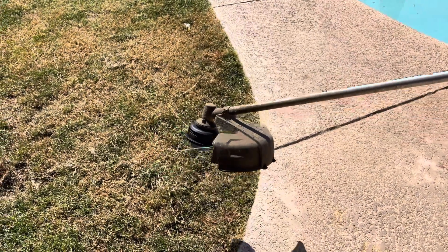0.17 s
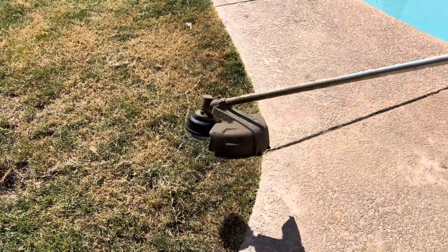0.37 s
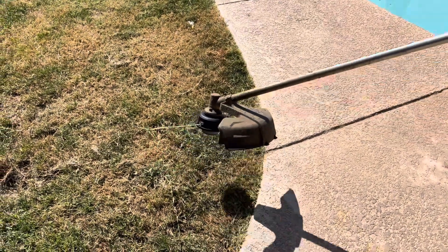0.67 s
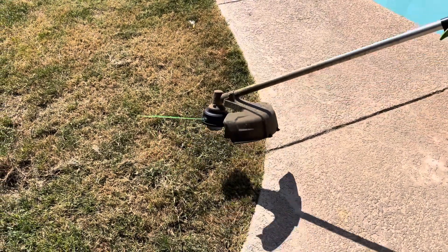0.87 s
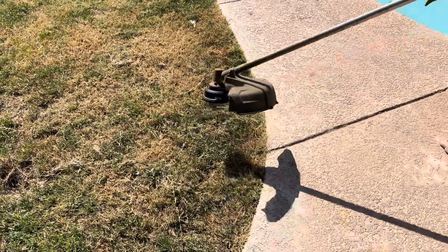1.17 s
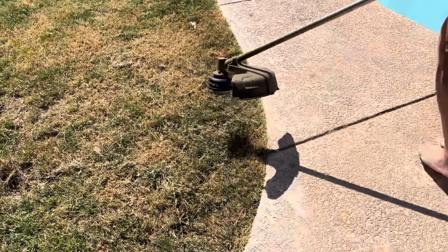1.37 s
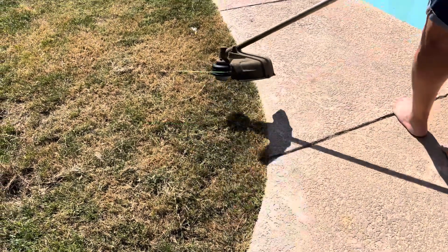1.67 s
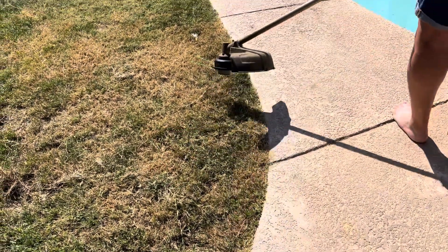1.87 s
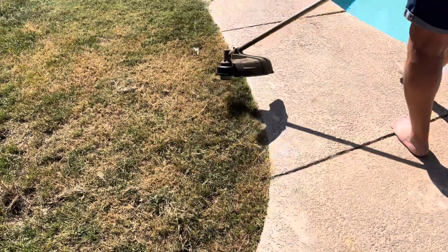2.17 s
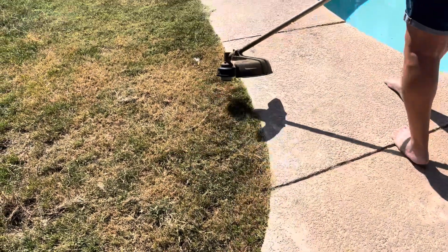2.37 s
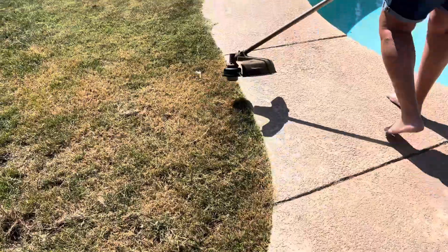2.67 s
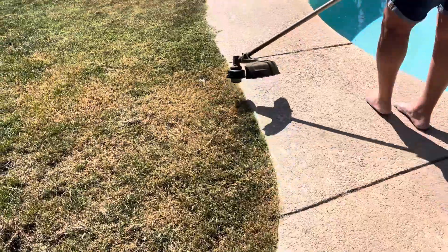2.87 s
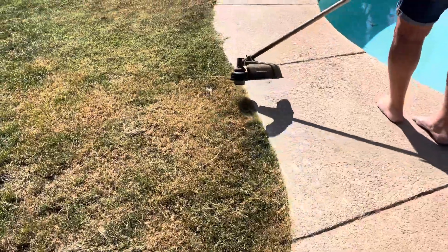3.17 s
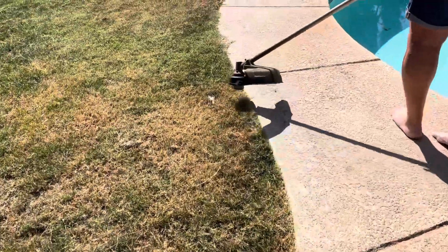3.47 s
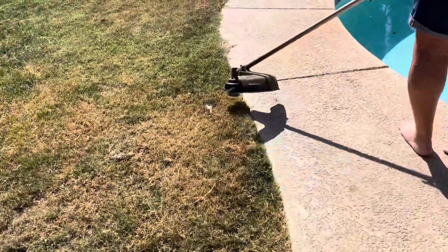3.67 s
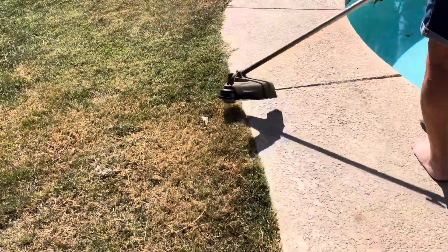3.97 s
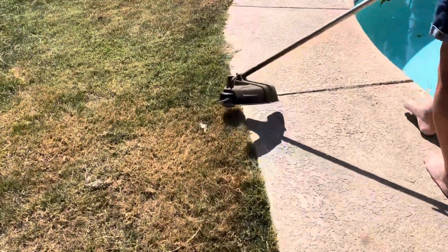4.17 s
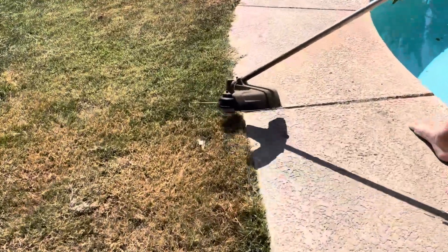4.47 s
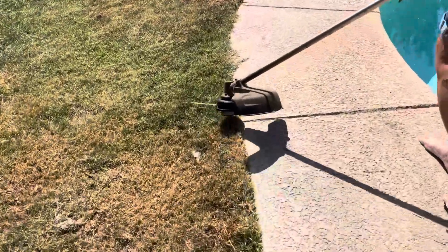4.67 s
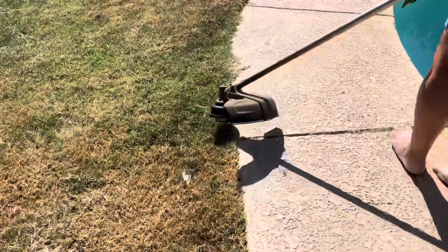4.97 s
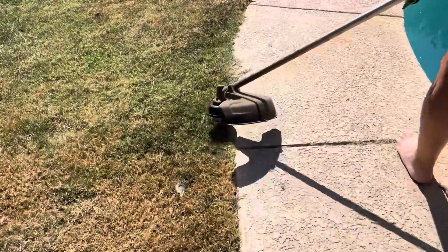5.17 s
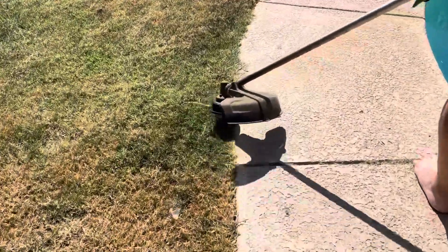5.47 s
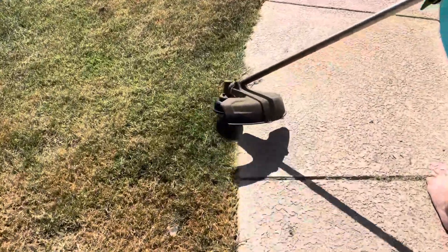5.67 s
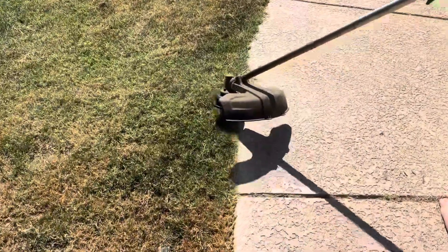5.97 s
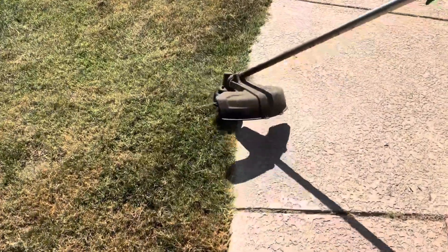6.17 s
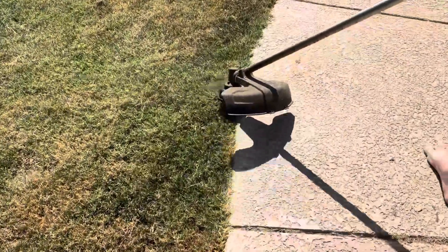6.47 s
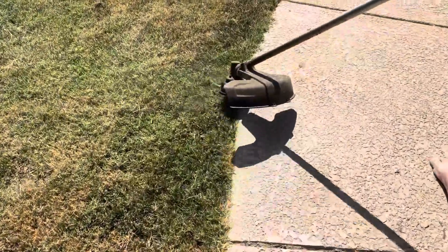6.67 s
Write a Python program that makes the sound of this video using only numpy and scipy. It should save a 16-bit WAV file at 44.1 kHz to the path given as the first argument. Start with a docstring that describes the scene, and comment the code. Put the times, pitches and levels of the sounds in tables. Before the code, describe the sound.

A string trimmer edges a dry lawn by a concrete path, heard close in stereo outdoors. From 0 to 1 second, separate hard slaps of line on concrete spray sharp grit and ring the plastic guard and shaft; a pebble tocks at 0.3, and a wavering swish climbs quickly around 0.9. From 1.0 to 1.3 the blows crowd together with snapping, falling thumps; another strong thump lands at 1.8, weaker ones until 2.8. Between 1.5 and 3.4, shorter scuffs, chattering drags and pattering grit continue, with soft air buffeting strongest near 1.4. The drive speeds up from 3.1 to 3.4. By 4 seconds the clatter is gone, leaving bright shredding hiss, dry crackle and a thin steady whine near 1.9 kHz. A low fluttering hum around 200 Hz swells in after 5.3, and a pulsing rasp thickens from 6 to the end at 6.8.

```python
"""Dry lawn along a concrete path: a cordless string trimmer edges it, close by.
At first the nylon line slaps the concrete and flings grit against the plastic guard; some blows end in a
falling thump. Then it runs in the grass: the line hums and hisses, blades crackle, the drive whines.
Sines on multiples of the turning rate make hum and whine; shaped noise and rung resonances make the rest.
Table levels are relative, before the trims in the functions."""
import sys
import numpy as np
from scipy import signal
from scipy.fft import rfft, irfft, next_fast_len
from scipy.io import wavfile
from scipy.ndimage import uniform_filter1d, map_coordinates

SR = 44100
rng = np.random.default_rng(int(sys.argv[2]) if len(sys.argv) > 2 else 0)


def master_out(mix):
    """Clip the mix to full scale and print it as 16-bit PCM to the path in sys.argv[1]."""
    frames = np.transpose(np.atleast_2d(mix))
    ceiling = np.clip(frames, -1, 1)
    pcm = np.round(ceiling * 32767).astype(np.int16)
    wavfile.write(sys.argv[1], SR, pcm)


N = 301203

WHINES_PER_TURN = 19
SIDES = np.array([[1], [-1]])  # left, right

# drag of the grass on the line: time_s, share (0-1)
LOAD_ROWS = [(3.6, 0.35), (4, 0.57), (6.83, 0.85)]
# hum of the line: time_s, level_db
HUM_ROWS = [(2.95, -85), (3.14, -52), (3.36, -51), (3.6, -52), (3.77, -63), (3.9, -55), (4.1, -55.5),
            (4.3, -66), (4.46, -51), (4.6, -55.5), (5.27, -51), (5.35, -37), (5.41, -54), (5.48, -42),
            (5.7, -44.5), (5.8, -54), (6.0, -48), (6.05, -40), (6.28, -37), (6.35, -46), (6.43, -35),
            (6.56, -36), (6.7, -45), (6.8, -37.5)]
# blows that end in a falling thump and a lull in the hiss: start_s, level_db, swell_s
THUMP_ROWS = [(1.014, -15, 0.0079), (1.062, -14, 0.0067), (1.153, -14, 0.011), (1.207, -9, 0.0079),
              (1.288, -12, 0.01), (1.803, -9.5, 0.0024), (2.303, -23, 0.003), (2.509, -20, 0.0026),
              (2.848, -19, 0.0018)]
# swish spectrum: freq_hz, density_db (per Hz)
SWISH_SPECTRUM = [(1800, -22.5), (2900, -1), (3700, 0.5), (4500, 4), (5300, 2.5), (6400, 0), (7500, -13),
                  (10000, -60)]
# phase by which the left microphone port leads: freq_hz, lead_rad
PORT_LEAD = [(100, 0.5), (1300, 0.96), (2000, -0.9), (3100, 1.5), (3900, 0), (4600, 1.5), (5350, 4),
             (6000, 6), (7200, 7.5), (8700, 6.5), (9500, 4), (10250, 3), (10900, 2.4), (11400, 0.5),
             (12700, -0.5), (13700, -3.5), (15000, -6)]


def amp(db):
    """Decibels to gain."""
    return np.exp(np.asarray(db) * (np.log(10) / 20))


def unit(x):
    """Scale to rms 1."""
    return x / np.sqrt(np.mean(x ** 2) + 1e-20)


def along(points, hz):
    """Read (Hz, value) points on a log axis."""
    f, v = np.transpose(points)
    return np.interp(np.log(hz + 1), np.log(f + 1), v)


def curves(rows):
    """One value per sample for each column after the time."""
    s, *cols = np.transpose(rows)
    return [np.interp(np.arange(N) / SR, s, c) for c in cols]


def wobble(rate_hz):
    """Smooth random curve with rate_hz knots a second."""
    coarse = np.arange(N + 32)[::32]
    knots = rng.standard_normal(int(N * rate_hz / SR) + 4)
    smooth = map_coordinates(knots, [coarse * rate_hz / SR])
    return np.float32(np.interp(np.arange(N), coarse, smooth))


def filtered(x, response):
    """Apply a complex response of frequency."""
    m = next_fast_len(N + 8192, real=True)
    return irfft(rfft(x, m) * response(np.fft.rfftfreq(m, 1 / SR)), m)[..., :N]


def shape(points):
    """Response of a smooth spectrum."""
    return lambda hz: amp(along(points, hz))


def body(modes):
    """Sum of band-pass resonances (Hz, width Hz, dB) with alternating signs."""
    def response(f):
        total = 0
        for k, (centre, width, db) in enumerate(modes):
            damping = 1j * f * width
            total = total + (-1) ** k * amp(db) * damping / (centre * centre - f * f + damping)
        return total
    return response


def noise(response, envelope):
    """Enveloped, filtered noise at two ports, partly alike and phase-shifted; mid level follows the envelope."""
    # likeness of the two ports: freq_hz, likeness (0-1)
    port_likeness = [(100, 1), (350, 0.99), (620, 0.69), (1000, 1), (2100, 0.61), (2800, 0.55),
                     (5200, 0.26), (7000, 0.35), (8000, 1), (10250, 1), (11100, 0.94), (12000, 0.73)]
    m = next_fast_len(N + 8192, real=True)
    hz = np.fft.rfftfreq(m, 1 / SR).astype(np.float32)
    alike, lead = np.float32([np.clip(along(port_likeness, hz), 0, 1), along(PORT_LEAD, hz)])
    gain = response(hz).astype(np.complex64)
    sources = rng.standard_normal((3, N), dtype=np.float32) * np.float32(envelope)
    common, left, right = rfft(sources, m)
    turn = np.cos(lead / 2) + 1j * np.sin(lead / 2)
    shared = np.sqrt(alike) * common * np.array([turn, turn.conj()])
    own = np.sqrt(1 - alike) * np.array([left, right])
    mid_power = np.mean(abs(gain) ** 2 * (1 + alike * np.cos(lead)) / 2)
    return irfft((shared + own) * gain, m)[:, :N] / np.sqrt(mid_power)


def grains(rate_hz, spread_db, life_s, share):
    """Envelope of brief random snaps holding a share of the power, on a steady bed."""
    chance, size = rng.random(N), rng.standard_exponential(N)
    snaps = (chance < rate_hz / SR) * amp(spread_db * np.minimum(size, 4))
    power = signal.lfilter([1], [1, -np.exp(-1 / (life_s * SR))], snaps ** 2)
    share = np.clip(share, 0, 1)
    return np.sqrt(1 - share + share * power / power.mean())


def lull(depth_db):
    """Gain that sinks briefly after each thump."""
    t = np.arange(N) / SR
    inside = sum((t > s + 0.008) & (t < s + 0.054) for s, _, _ in THUMP_ROWS)
    return amp(-depth_db * uniform_filter1d(inside.astype(float), size=300))


def patchy(x, depth_db):
    """Narrow bands swell and fade as the head moves over the ground."""
    z = signal.stft(x, nperseg=1024)[2]
    field = uniform_filter1d(rng.standard_normal(z.shape[1:]), size=3, axis=0)
    field = uniform_filter1d(field, size=36, axis=1)
    return signal.istft(z * unit(amp(depth_db * unit(field))), nperseg=1024)[1][:, :N]


def bass_ports(x):
    """Low sounds reach the left port earlier and louder."""
    lead_rad, balance_db = 0.85, 1.5  # balance is added left, taken off right
    ports = filtered(x, lambda hz: np.exp(0.5j * SIDES * lead_rad * hz / (hz + 10)))
    return ports * amp(SIDES * balance_db)


def contact_level(offset_db, slope):
    """Level in dB that follows contact strength, plus slope times its brightness."""
    # how hard the line works against the ground: time_s, level_db
    contact_rows = [(0, -45), (.25, -48), (.5, -41), (.75, -37), (.9, -40.5), (1.02, -32), (1.12, -42),
                    (1.42, -40.5), (1.65, -32), (1.83, -41), (2.05, -38.5), (2.16, -39.5), (2.45, -36),
                    (2.7, -34.5), (2.735, -39), (2.82, -33), (3.03, -33.5), (3.075, -36), (3.15, -37),
                    (3.85, -41.5), (4.4, -37), (4.7, -37), (5.5, -34), (6.5, -32.5), (6.83, -36)]
    # contact brightness, dull on concrete and bright in grass: time_s, brightness_db
    bright_rows = [(0, -9), (.2, -8), (.5, -16), (.95, -12), (1.14, 2), (1.38, -6.5), (1.5, -4.5),
                   (1.9, -1.5), (2.5, 0), (3.9, 5), (4.4, 2.5), (6.83, 1)]
    return curves(contact_rows)[0] + offset_db + slope * curves(bright_rows)[0]


def partial(turns, multiple, blur_rad):
    """Sine of rms 1 at a multiple of the turning rate, its phase blurred at random."""
    phase = 2 * np.pi * (multiple * turns % 1) + blur_rad * wobble(45)
    return np.sqrt(2) * np.sin(np.float32(phase))


def tones(turns):
    """Two line ends hum at twice the turning rate; the drive whines on a high multiple of it."""
    # overtones of the whirling line: time_s, fourth_db, sixth_db (at 4 and 6 times the turning rate)
    overtone_rows = [(3.7, -85, -75), (4.1, -74, -57), (4.3, -52, -52), (4.65, -51, -58), (5.15, -48, -49),
                     (5.7, -46.5, -53), (6.05, -47, -57), (6.4, -48, -59), (6.58, -61, -60),
                     (6.83, -46.5, -57)]
    # weaker line overtones: multiple (of the turning rate), level_db (over the fourth)
    faint_rows = [(3, -10.5), (5, -17), (8, -10), (10, -5)]
    # drive tones as it comes up to power: time_s, level_db
    drive_rows = [(3.4, -84), (3.85, -52), (4.25, -46), (4.9, -45), (5.1, -39), (5.7, -38), (6.5, -38.5),
                  (6.83, -41)]
    # thin, shrill partials of the drive: time_s, third_db, sixth_db (at 3 and 6 times the whine)
    shrill_rows = [(3.55, -80, -53), (3.82, -47, -44), (4.2, -55, -41), (4.72, -46, -49),
                   (4.85, -41.5, -44), (5.08, -40, -45), (5.18, -51, -54), (5.58, -46, -58),
                   (5.73, -35, -60), (5.88, -45, -60), (6.1, -62, -55), (6.72, -62, -60), (6.78, -39, -50),
                   (6.83, -54, -45)]
    hum_db, = curves(HUM_ROWS)
    drive_db, = curves(drive_rows)
    load, = curves(LOAD_ROWS)

    # reaching the grass makes the hum flutter
    in_grass = np.clip((np.arange(N) / SR - 3.62) / 0.28, 0, 1)
    flutter_db = 4.5 * np.clip(wobble(24), -2.5, 1.3) * in_grass
    hum = amp(hum_db - 4.5 + flutter_db) * partial(turns, 2, 0.65 * load)

    fourth_db, sixth_db = curves(overtone_rows)
    stack = [(4, fourth_db), (6, sixth_db)]
    stack += [(k, fourth_db + db) for k, db in faint_rows]
    overtones = sum(amp(db - 2.5 + 1.3 * wobble(9)) * partial(turns, k, 0.25) for k, db in stack)

    whine = amp(drive_db - 5.5 + 1.7 * wobble(24)) * partial(turns, WHINES_PER_TURN, 0.35)
    octave_db = drive_db - 9.5
    shrill = 0
    for k, db in zip((2, 3, 6), [octave_db, *curves(shrill_rows)]):
        level = amp(db + 2 * wobble(15))
        shrill = shrill + level * partial(turns, k * WHINES_PER_TURN, 0.25 * k)
    return (hum + overtones) * amp(SIDES) + whine + shrill


def flap():
    """The line flaps unevenly in the grass: a rough narrow-band drone just under its hum."""
    hum_db, = curves(HUM_ROWS)
    level = amp(hum_db - 12 + 4.5 * wobble(14)) * curves(LOAD_ROWS)[0]
    return noise(lambda f: 1 / (1 + ((f - 176) / 26) ** 4), level)


def rush(turns):
    """The line tears through air and grass; scrape and hiss strengthen as each end sweeps past."""
    # air rumbling round the head: time_s, level_db
    wash_rows = [(0, -43), (.25, -47), (.5, -41), (.8, -35.5), (1, -39.5), (1.15, -54), (1.45, -44.5),
                 (1.68, -42), (1.86, -56), (2.4, -53), (2.75, -50.5), (3.05, -45.5), (3.2, -50),
                 (3.4, -53.5), (3.85, -60.5), (4.4, -52), (4.7, -50), (5.5, -48), (6.5, -44.5), (6.83, -46)]
    # spectra: freq_hz, density_db (per Hz)
    rumble_spectrum = [(40, -24), (100, -3.5), (170, 1.5), (300, 1), (520, 0), (650, 1), (760, -6),
                       (880, 5.5), (1100, -5), (2000, -60)]
    scrape_spectrum = [(500, -51), (780, -5), (950, -0.5), (1300, 1.5), (1600, 3.5), (1850, 5), (2200, 6.5),
                       (2550, 0), (3050, 8), (4000, -53), (6000, -60)]
    hiss_spectrum = [(4500, -39), (6500, -5.5), (7900, 0.5), (8600, -0.5), (9300, 6), (9900, 7),
                     (10500, -3), (11300, -0.5), (11900, -14.5), (12800, -60), (16000, -65)]
    load, = curves(LOAD_ROWS)
    sweep = unit(1 + 0.22 * np.cos(4 * np.pi * turns))
    crackle = sweep * grains(rate_hz=400, spread_db=2, life_s=0.00041, share=0.32)
    rumble = noise(shape(rumble_spectrum), amp(curves(wash_rows)[0] + 1.2 * wobble(20)))

    # load terms: dB change at full drag
    scrape_db = contact_level(-2.83, -0.66) - 2 * load + 1.17 * wobble(40)
    scrape_grain = grains(rate_hz=370, spread_db=2.5, life_s=0.0007, share=0.66 * (1 - load))
    scrape = noise(shape(scrape_spectrum), amp(scrape_db) * sweep * scrape_grain)

    swish_db = contact_level(-0.32, 0) - 1.3 * load
    swish_grain = grains(rate_hz=450, spread_db=1.5, life_s=0.00058, share=0.65 * (1 - load))
    swish = noise(shape(SWISH_SPECTRUM), amp(swish_db) * swish_grain)

    hiss_db = contact_level(0.71, 0.85) + 6 * load
    hiss = noise(shape(hiss_spectrum), amp(hiss_db) * crackle)  # blades shred
    ground = scrape + swish * lull(depth_db=1) + hiss * lull(depth_db=11.5)
    return rumble + patchy(ground, depth_db=3)


def rasp(turns):
    """In thick grass each passing line end tears a resonant burst of its own strength."""
    # line ends rasping: time_s, level_db
    rasp_rows = [(5.75, -64), (6, -46), (6.15, -39), (6.3, -34.5), (6.41, -39.5), (6.55, -34),
                 (6.62, -35.5), (6.72, -37), (6.83, -36)]
    # rasp resonances: freq_hz, width_hz, level_db
    rasp_modes = [(2160, 100, -4.5), (3030, 198, -7.5), (3720, 370.7, -1.5), (4600, 310, 0)]
    db, = curves(rasp_rows)
    passes = unit(amp(5.87 * np.cos(4 * np.pi * turns) + 3.1 * wobble(70)))
    return noise(body(rasp_modes), amp(db) * passes)


def skim():
    """The line skims the ground: noise on a wavering carrier climbs and widens as the line gathers speed."""
    # swish band: time_s, centre_hz, level_db
    skim_rows = [(0, 2150, -40), (.3, 2300, -36), (.5, 2445, -29.5), (.58, 2700, -34), (.68, 3010, -30.5),
                 (.76, 3150, -25), (.83, 3900, -48), (.86, 4960, -38), (.875, 5510, -19), (.9, 4600, -19.5),
                 (.92, 4210, -30), (.945, 4810, -24), (.975, 3830, -28), (1.005, 4490, -24),
                 (1.03, 4450, -38), (1.08, 4400, -70)]
    hz, db = curves(skim_rows)
    breadth = np.clip((hz - 2800) / 1800, 0, 1)
    ragged = amp(db) * grains(rate_hz=200, spread_db=2, life_s=0.0015, share=0.78)
    narrow = noise(lambda f: 1 / (1 + (f / 380) ** 2), amp(-5) * ragged * np.sqrt(1 - breadth))
    wide = noise(lambda f: 1 / (1 + (f / 1900) ** 4), amp(-4.5) * ragged * np.sqrt(breadth))
    cycles = np.cumsum(hz * (1 + 0.077 * wobble(70))) / SR
    return (narrow + wide) * np.sqrt(2) * np.sin(2 * np.pi * cycles)


def blows():
    """Gritty scuffs spray dust and ring guard and shaft, plus a ping at a pitch set by the spot hit."""
    # hard blows of the line on concrete and guard: start_s, knock_db, spray_db, ring_hz
    blow_rows = [(0.0156, -30.5, -19.5, 2250), (0.071, -38, -26, 2200), (0.1194, -15.5, -10, 1990),
                 (.192, -15.5, -8, 1767), (0.271, -29.5, -26.5, 1770), (.31, -34, -24, 1410),
                 (0.3555, -24.5, -16.5, 2320), (.465, -35, -25, 2500), (.4792, -25, -26, 2200),
                 (.504, -29, -29, 2190), (0.528, -24, -21.5, 2040), (.572, -23, -27, 2055),
                 (.6755, -24.5, -25, 2260), (0.7016, -31, -18, 3000), (.7355, -16, -14.5, 2140),
                 (0.7918, -14.5, -14.5, 2344), (.836, -22, -13.5, 2270), (0.932, -23, -21, 1750),
                 (.964, -21, -34, 2306), (0.9805, -13, -18, 2110), (1.014, -15, -13, 1747),
                 (1.048, -20, -18, 1705), (1.06, -28.5, -13, 1690), (1.1208, -19.5, -13.5, 1894),
                 (1.152, -23, -18, 1530), (1.2057, -20.5, -12.5, 1804), (1.233, -26.5, -21, 2230),
                 (1.287, -17.5, -11, 1797), (1.2988, -25, -13, 1540), (1.3157, -26, -19.5, 1643),
                 (1.3667, -27.5, -24, 1860), (1.491, -28.5, -30, 2136), (1.572, -19, -15.5, 1293),
                 (1.5904, -21.5, -18, 1680), (1.6365, -25, -7.5, 1460), (1.666, -24, -16.5, 1040),
                 (1.699, -24, -19, 1970), (1.73, -23, -14.5, 1440), (1.7629, -25.5, -27, 1018),
                 (1.793, -24, -19, 1506), (1.843, -32.5, -46, 1510), (1.908, -25.5, -12, 1260),
                 (1.944, -29.5, -21, 2090), (2.0295, -26.5, -15.5, 1630), (2.045, -28, -19, 1633),
                 (2.072, -24, -14, 4120), (2.0923, -27.5, -20, 2100), (2.132, -25.5, -16, 3230),
                 (2.172, -30.5, -37, 1790), (2.217, -31.5, -20, 3030), (2.2993, -26, -31, 3240),
                 (2.351, -26, -17.5, 1935), (2.396, -44, -19, 2920), (2.42, -42, -17, 2000),
                 (2.44, -29, -25, 2950), (2.464, -26, -20, 3760), (2.5055, -24.5, -25, 1320),
                 (2.5546, -29.5, -23, 1670), (2.5947, -28, -23, 1240), (2.6305, -30, -19, 1150),
                 (2.643, -33, -13, 3600), (2.667, -38, -15, 1310), (2.699, -25, -9.5, 3660),
                 (2.776, -36, -18, 2530), (2.845, -23, -17, 1700), (2.9594, -25, -14, 2360),
                 (2.991, -25, -12, 2370), (3.024, -29, -14, 2510), (3.048, -34, -18, 3930),
                 (3.082, -27.5, -15, 2270), (3.107, -28, -14, 2280), (3.124, -31, -26, 1900),
                 (3.184, -47, -19, 3000), (3.266, -34, -18, 2850), (3.389, -32, -13, 2650),
                 (6.566, -48, -8, 4195), (6.616, -39, -7, 3920)]
    # shaft ring, damped once the head rests on the lawn: time_s, level_db (over the knock)
    shaft_ring_rows = [(0, -17.5), (.36, -3), (.55, -1.5), (.75, -0.5), (.95, -5), (1.15, -12), (1.55, -8),
                       (1.9, -12.5), (3.3, -16)]
    # resonances: freq_hz, width_hz, level_db
    guard_modes = [(990, 42, -0.5), (1268, 91, 0.5), (1443, 49, 6), (1710, 100, 5.5), (2000, 220, 3),
                   (2335, 170, 3.5), (2663, 67, -2.5), (3160, 110, 1)]
    shaft_modes = [(190, 50, -10), (294, 16, 5), (445, 36, 1), (500, 14, 3.5), (615, 26, 6), (917, 110, -5)]
    # spray spectrum: freq_hz, density_db (per Hz)
    spray_spectrum = [(4500, -60), (6300, -26), (7200, -1.5), (8700, 3.5), (9900, 15), (11200, 2),
                      (12500, -5), (13900, -28), (15600, -8.5), (16500, -42)]
    t = np.arange(SR // 5) / SR
    power, pings = np.zeros((4, N + SR)), np.zeros((2, N + SR))
    flutter = unit(filtered(rng.standard_normal((2, N)), lambda f: 1 / (1 + (f / 290) ** 2)))
    # base t60 in s: shaft, guard, crack, spray
    life_s = 0.06 * np.array([[1.1], [0.85], [0.8], [0.6]])
    attack = 1 - np.exp(-t / 0.0017)
    for s, knock_db, spray_db, ring_hz in blow_rows:
        start = max(round(s * SR), 0)
        # glancing blows are briefer: each 24 dB of spray over knock halves the length
        haste = 2 ** ((spray_db - knock_db) / 24)
        fall = amp(-60 * t / life_s * haste) * attack
        shaft_db = knock_db + np.interp(s, *np.transpose(shaft_ring_rows))
        crack_db = (knock_db + spray_db) / 2 - 0.84
        level = amp([[shaft_db], [knock_db + 3.5], [crack_db], [spray_db + 1]])
        power[:, start:][:, :len(t)] += (level * fall) ** 2
        quadrature = [1, 1j] @ flutter.take(start + np.arange(len(t)), axis=1, mode="wrap")
        phase = 2 * np.pi * ring_hz * t + along(PORT_LEAD, ring_hz) * SIDES / 2
        ping = np.real(quadrature * np.exp(1j * phase))
        pings[:, start:][:, :len(t)] += amp(knock_db + 3) * fall[1] * ping
    shaft, knock, crack, spray = np.sqrt(power[:, :N])
    scuff = grains(rate_hz=1400, spread_db=3, life_s=0.00011, share=0.43)
    ring = noise(body(shaft_modes), shaft) + noise(body(guard_modes), knock * scuff) + pings[:, :N]
    return ring + noise(shape(SWISH_SPECTRUM), crack * scuff) + noise(shape(spray_spectrum), spray * scuff)


def drags(edge_s=0.0024):
    """The line drags along the concrete edge and chatters: rough noise bursts round one pitch."""
    # drags: start_s, length_s, level_db, centre_hz, width_hz
    drag_rows = [(1.575, 0.038, -26.5, 1320, 380), (1.664, 0.054, -30, 2300, 1310),
                 (1.765, 0.027, -31.5, 1300, 450), (1.908, .05, -34, 1680, 600),
                 (2.033, .04, -33, 1700, 646), (2.441, 0.017, -30, 2920, 250),
                 (2.446, 0.046, -36, 1410, 380), (2.463, .015, -30, 3800, 350),
                 (2.558, 0.031, -35, 1590, 380), (2.593, 0.015, -26.5, 1220, 300),
                 (2.632, 0.0092, -28, 1170, 279), (2.634, .022, -31, 3300, 700),
                 (2.645, .045, -35, 1330, 220), (2.699, 0.017, -26, 3680, 550), (2.76, .05, -38, 2480, 200),
                 (2.882, 0.053, -30, 3070, 900), (2.922, 0.018, -28, 2500, 220),
                 (2.987, 0.064, -32, 2426, 230), (3.04, .012, -31, 3900, 200)]
    out = np.zeros((2, N + SR))
    chatter = grains(rate_hz=150, spread_db=1.5, life_s=0.0015, share=0.56)
    t = np.arange(SR // 8) / SR
    hz = np.fft.rfftfreq(len(t), 1 / SR)
    ports = np.exp(1j * along(PORT_LEAD, hz) * SIDES / 2)
    for s, length_s, db, centre_hz, width_hz in drag_rows:
        start = round(s * SR)
        scuff = rfft(rng.standard_normal(len(t)) + 0.5 * rng.standard_normal((2, len(t))))
        response = ports / (1 + ((hz - centre_hz) / width_hz) ** 4)
        band = unit(irfft(scuff * response, len(t)))
        gate = np.clip(np.minimum(t, length_s - t) / edge_s, 0, 1)
        out[:, start:][:, :len(t)] += amp(db) * gate * chatter[start:][:len(t)] * band
    return out[:, :N]


def thumps(start_hz=9000, glide_s=0.00014):
    """A sharp snap arrives first, then a swelling sine glides down as its bass trails behind."""
    # snap spectrum: freq_hz, density_db (per Hz)
    snap_spectrum = [(400, -14), (900, -9), (1700, 3), (3500, -4), (9000, -8), (14000, -35)]
    t = np.arange(SR // 6) / SR
    sweep = np.sin(2 * np.pi * start_hz * glide_s * np.log1p(t / glide_s))
    click = amp(-17.5) * np.exp(-t / 0.00049)  # the sharp front
    out, snaps = np.zeros((2, N + SR))
    for s, db, swell_s in THUMP_ROWS:
        start = round(s * SR)
        swelling = amp(db - 5) * t / swell_s * np.exp(1 - t / swell_s)
        out[start:][:len(t)] += sweep * (click + swelling)
        snaps[start:][:len(t)] += amp(-15.5 - 60 * t / 0.019)
    return bass_ports(out[:N]) + noise(shape(snap_spectrum), snaps[:N])


def tocks():
    """A pebble tocks on the guard and rings a single decaying mode."""
    # tocks: start_s, pitch_hz, level_db, t60_s
    tock_rows = [(0.311, 1390, -16.5, 0.05), (.358, 920, -30, 0.067)]
    t = np.arange(SR // 8) / SR
    attack = 1 - np.exp(-t / 0.00075)
    out = np.zeros(N + SR)
    for s, hz, db, t60_s in tock_rows:
        out[round(s * SR):][:len(t)] += amp(db - 60 * t / t60_s) * attack * np.sin(2 * np.pi * hz * t)
    return out[:N]


def grit():
    """Small stones and dry stalks tick on the guard in clumps; the stalks also snap, dry and brief."""
    # loose grit pattering on the guard: time_s, level_db
    grit_rows = [(0, -72), (.9, -36), (1.4, -53), (2.05, -40.5), (2.6, -29), (3.05, -33.5), (3.3, -36),
                 (3.55, -40), (3.9, -80)]
    # spectra: freq_hz, density_db (per Hz)
    tick_spectrum = [(600, -56), (1000, -10), (1350, -4), (1800, -25), (2450, 9), (3200, -1), (3900, 6),
                     (5200, -37), (7000, -41), (8700, 7), (9900, 20.5), (12000, -0.5), (15500, -19),
                     (16500, -35)]
    stalk_spectrum = [(600, -44), (1100, -5), (2500, -0.5), (4500, -1), (7000, -4.5), (9300, 3.5),
                      (12500, -7), (16000, -28)]
    db, = curves(grit_rows)
    level = amp(db + 2.7 * wobble(27.03))
    ticks = level * grains(rate_hz=130, spread_db=3, life_s=0.0007, share=0.92)
    snaps = level * grains(rate_hz=220, spread_db=3, life_s=0.00025, share=1)
    return noise(shape(tick_spectrum), amp(-1.5) * ticks) + noise(shape(stalk_spectrum), amp(-3.5) * snaps)


def yard(x):
    """A short answer from the walls around the lawn: convolution with decaying noise."""
    # decay of the yard: freq_hz, t60_s
    decay_points = [(200, 0.27), (2000, 0.29), (10000, 0.024)]
    hz, t, z = signal.stft(rng.standard_normal((2, SR // 3)), SR, nperseg=256)
    fall = amp(-60 * t / along(decay_points, hz)[:, None])
    tail = signal.istft(z * fall, SR, nperseg=256)[1]
    return signal.fftconvolve(x, tail / np.linalg.norm(tail[0]), axes=1)[:, :N]


def buffet():
    """Uneven puffs of air at the microphone: low noise, partly different at each port."""
    # buffeting: time_s, level_db
    buffet_rows = [(0, -52), (.3, -51), (.6, -43), (1.0, -45), (1.2, -41), (1.36, -39), (1.42, -30),
                   (1.48, -50), (1.75, -46), (1.9, -56), (2.1, -55), (2.5, -51), (3.05, -56), (3.2, -76),
                   (3.8, -88), (4.6, -68), (6, -72), (6.83, -59)]
    # gust spectrum: freq_hz, density_db (per Hz)
    gust_spectrum = [(20, -56), (32, -38), (48, -5), (66, 5), (120, -5.5), (200, -13.5), (500, -42)]
    db, = curves(buffet_rows)
    shared = unit(filtered(rng.standard_normal(N), shape(gust_spectrum)))
    own = unit(filtered(rng.standard_normal((2, N)), shape(gust_spectrum)))
    return bass_ports(amp(db - 3 + 4.4 * wobble(16)) * (shared + 0.12 * own))


def scene():
    """The turning head drives tones and rush; grit and blows sound on top."""
    # drive speed, surging on leaving the concrete and sagging in thick grass: time_s, whine_hz
    whine_rows = [(3.08, 1097), (3.18, 1555), (3.3, 1963), (3.42, 2070), (3.57, 1988), (3.77, 1858),
                  (4.1, 1897), (5.2, 1887), (5.37, 1880), (5.65, 1897), (5.82, 1906), (6.05, 1902),
                  (6.28, 1867), (6.4, 1882), (6.62, 1858), (6.83, 1943)]
    turns = np.cumsum(curves(whine_rows)[0]) / WHINES_PER_TURN / SR
    clatter = blows() + drags() + patchy(grit(), depth_db=2.5) * lull(depth_db=36)
    line = tones(turns) + flap() + rush(turns) + rasp(turns) + skim()
    trimmer = line + thumps() + tocks() + clatter + amp(-13) * yard(clatter)
    return trimmer * amp(0.25 * SIDES) + buffet()


def record(dry):
    """Clip at full scale, then cut everything above the band limit."""
    top_hz = 16100
    return filtered(np.clip(dry, -1, 1), lambda hz: hz < top_hz)


dry = scene()
out = record(dry)
master_out(out)
```